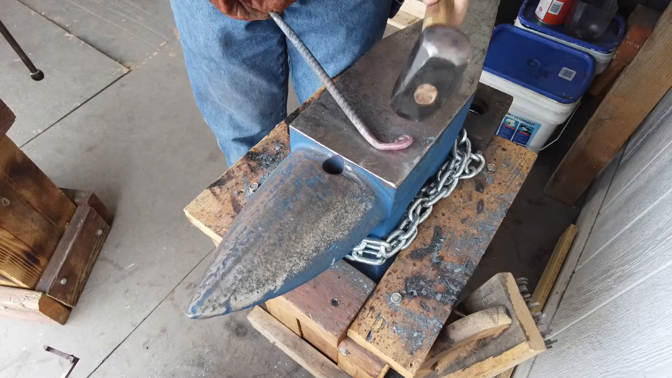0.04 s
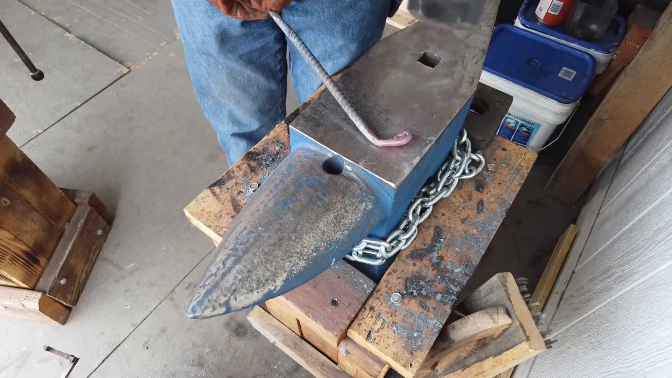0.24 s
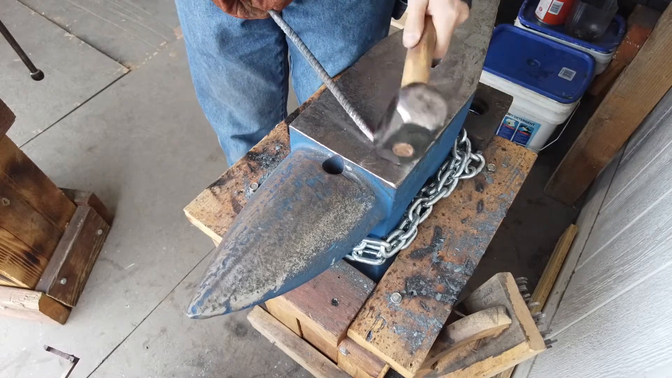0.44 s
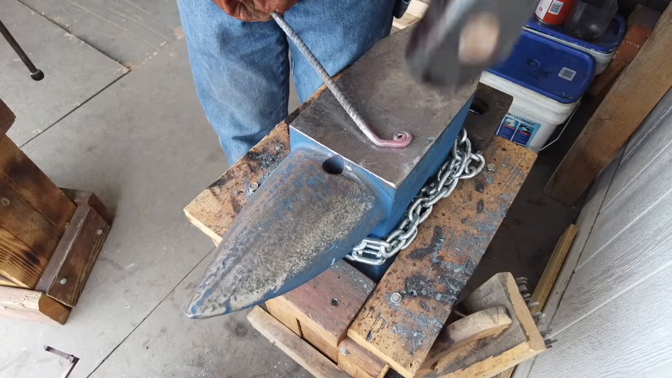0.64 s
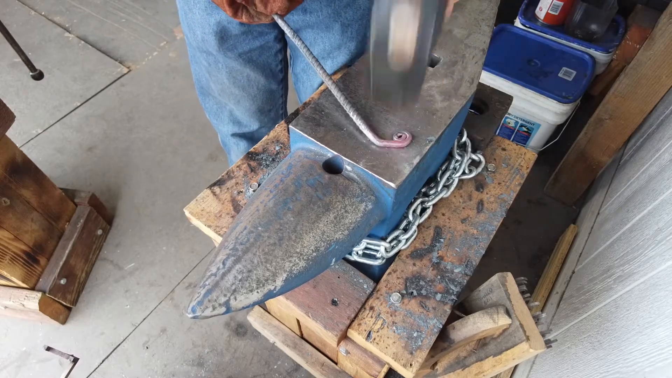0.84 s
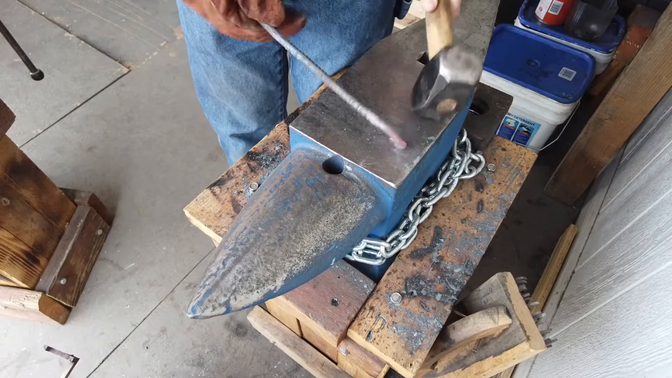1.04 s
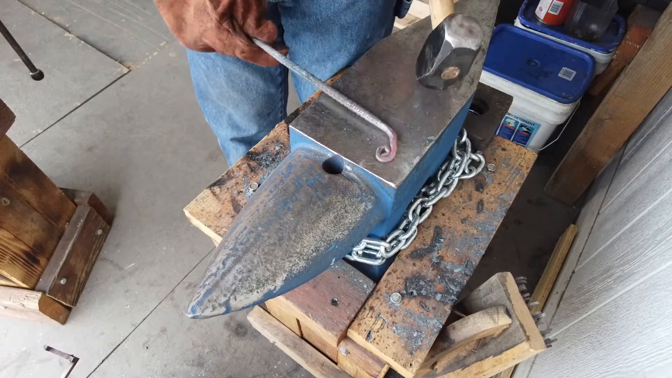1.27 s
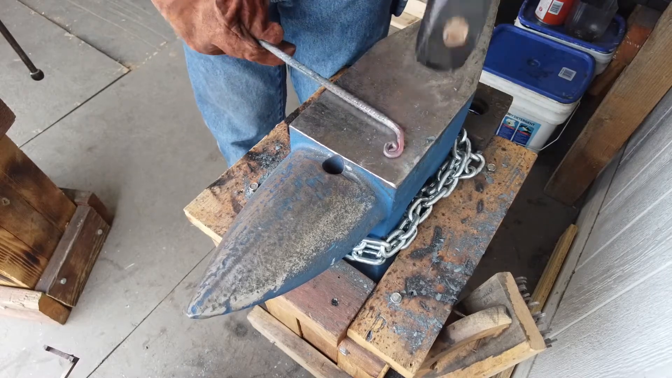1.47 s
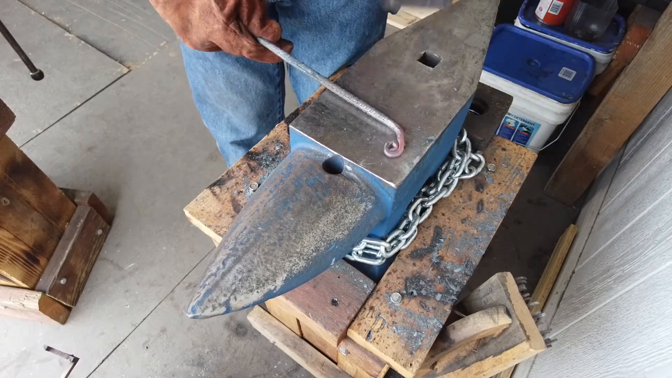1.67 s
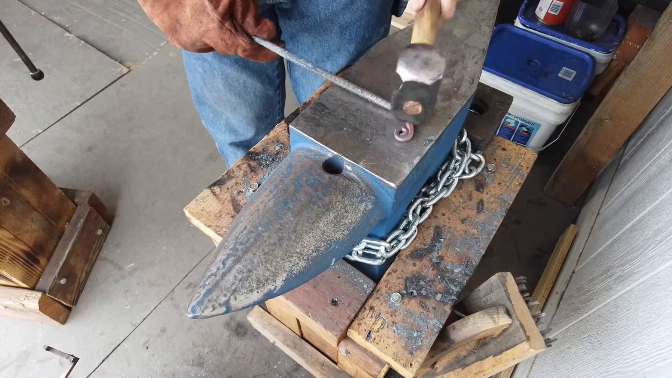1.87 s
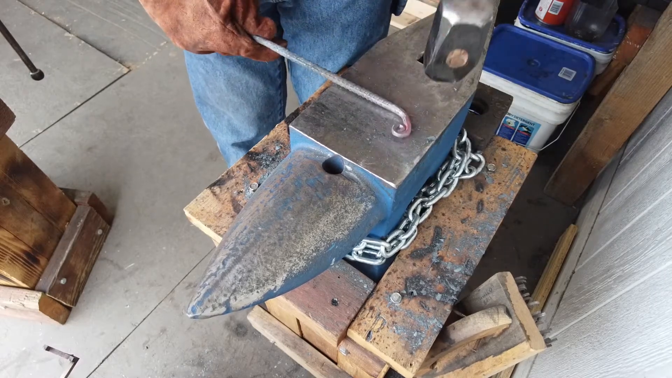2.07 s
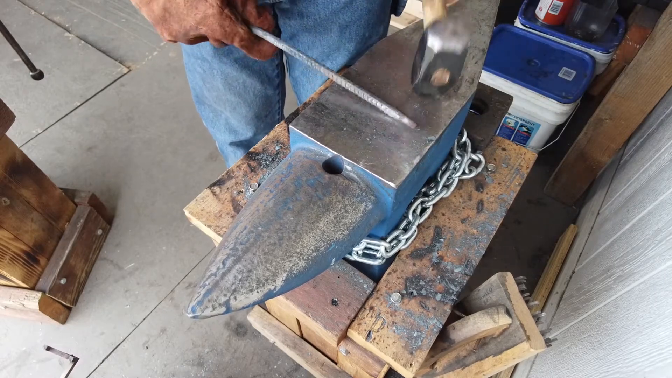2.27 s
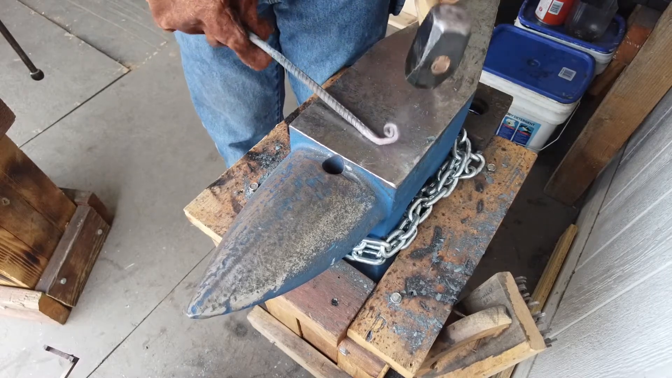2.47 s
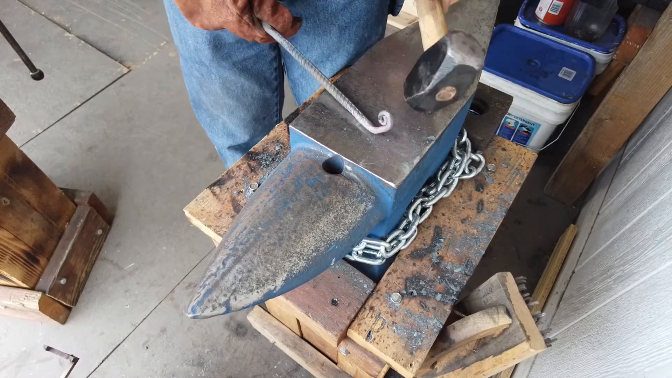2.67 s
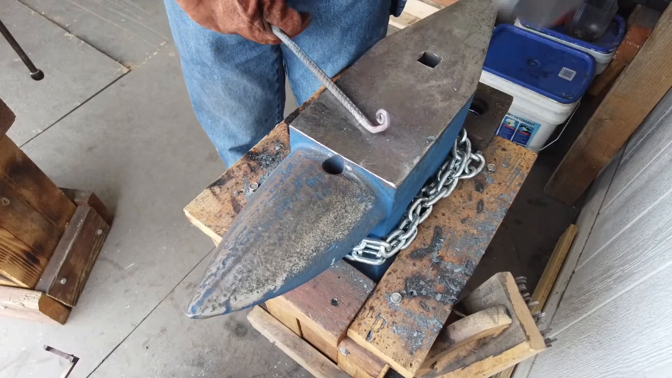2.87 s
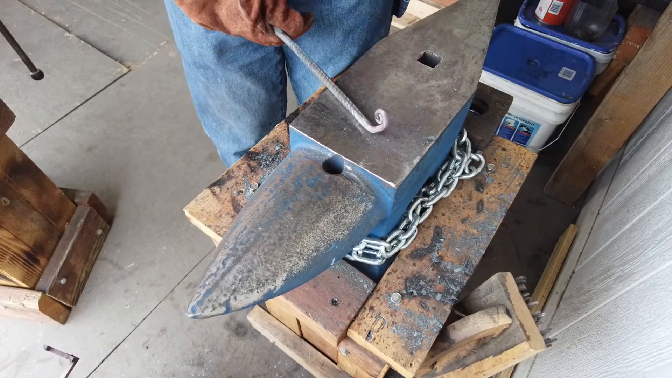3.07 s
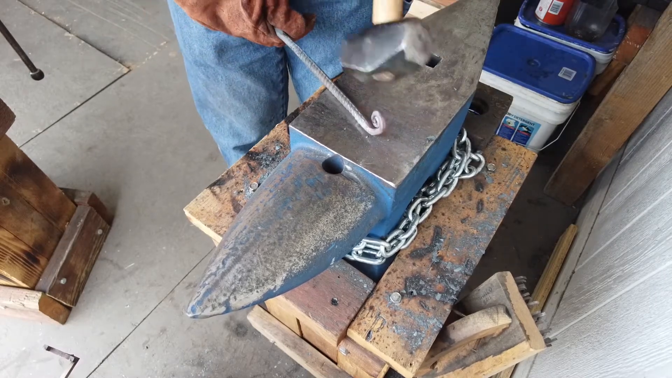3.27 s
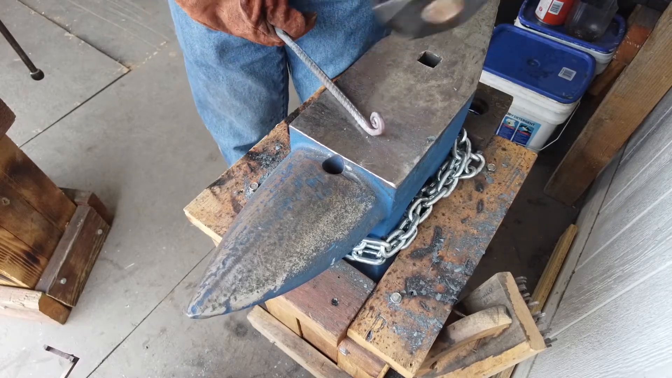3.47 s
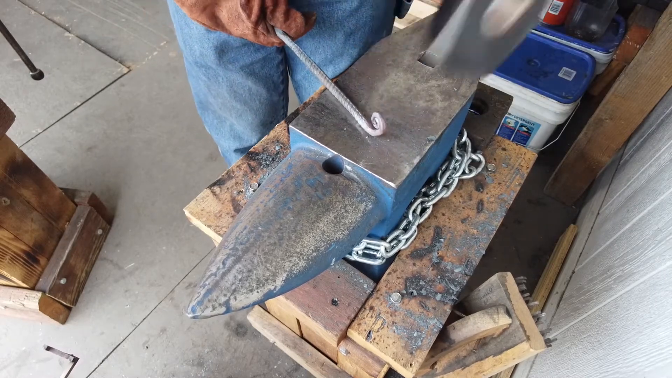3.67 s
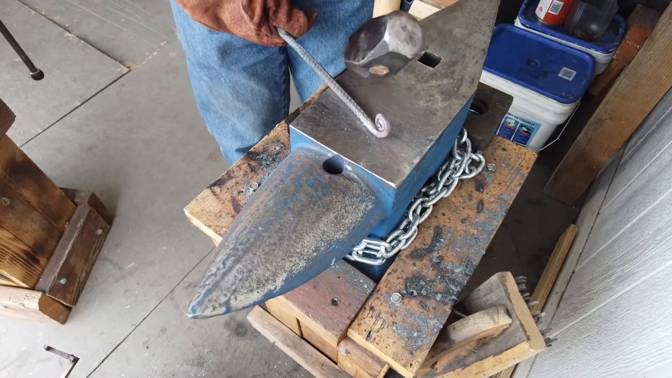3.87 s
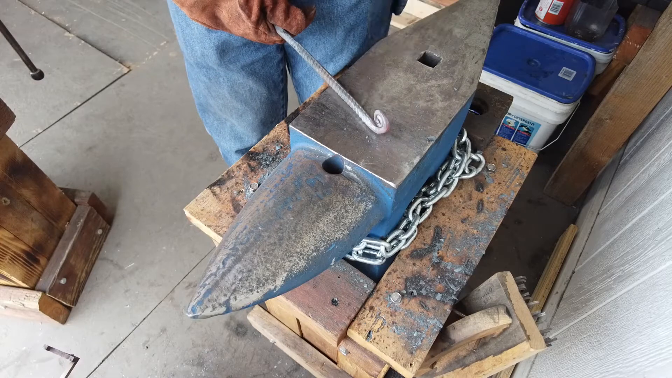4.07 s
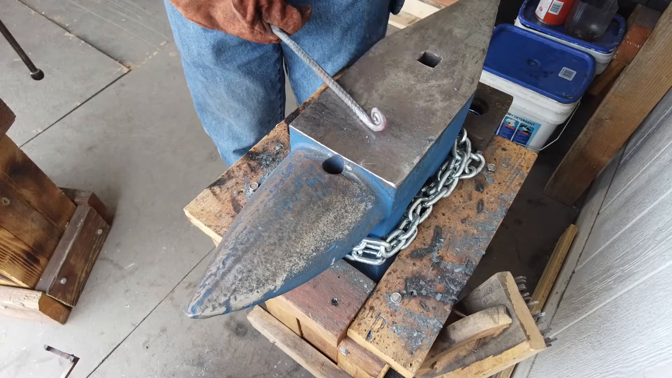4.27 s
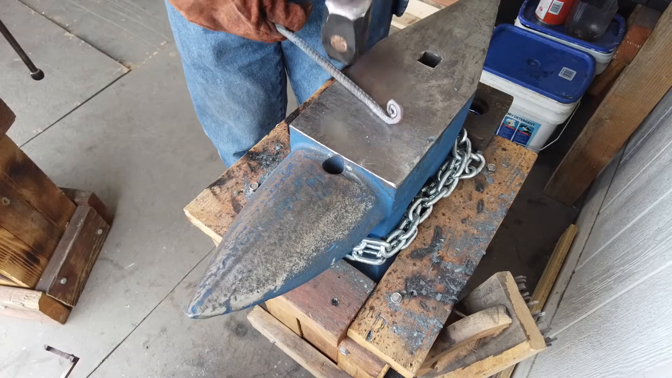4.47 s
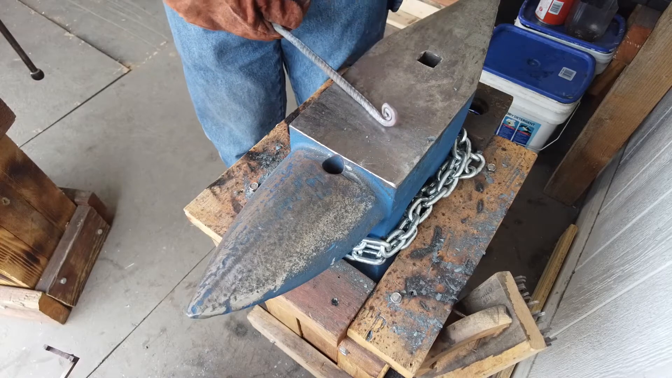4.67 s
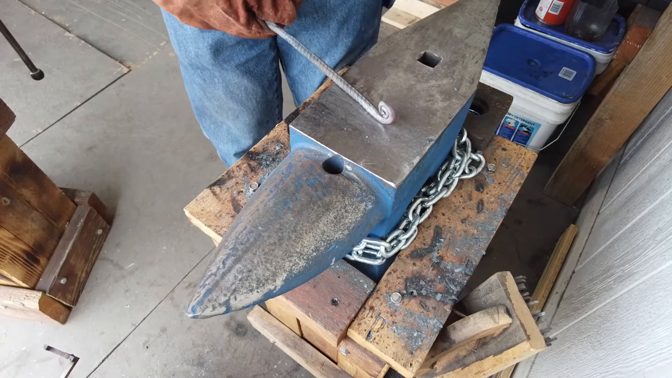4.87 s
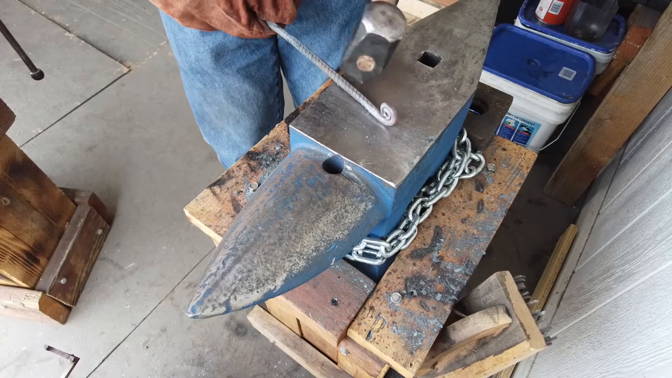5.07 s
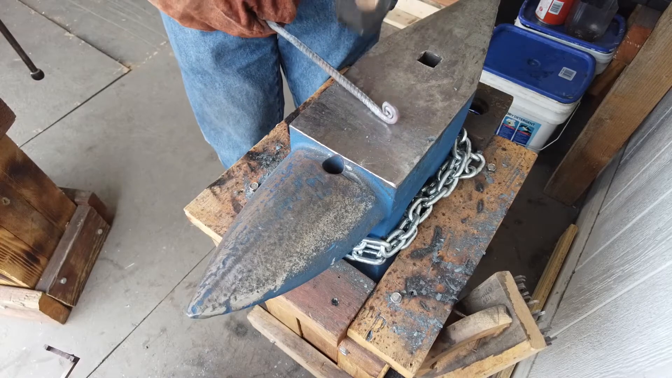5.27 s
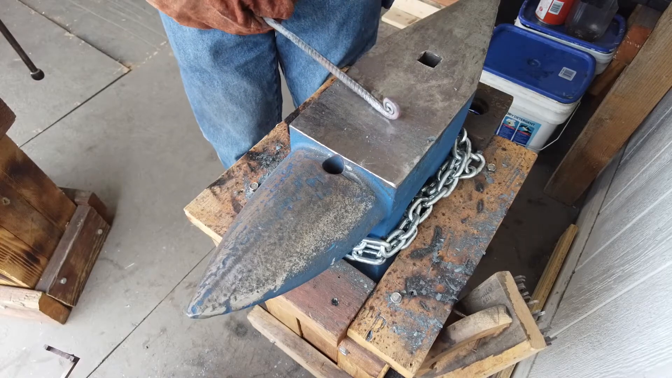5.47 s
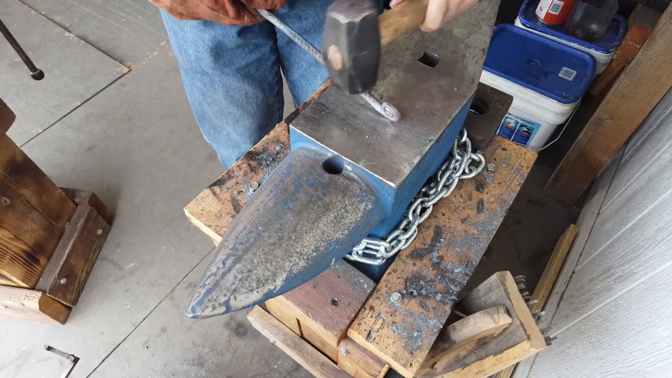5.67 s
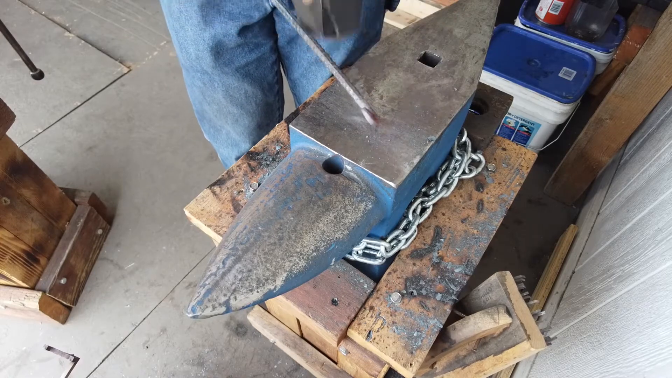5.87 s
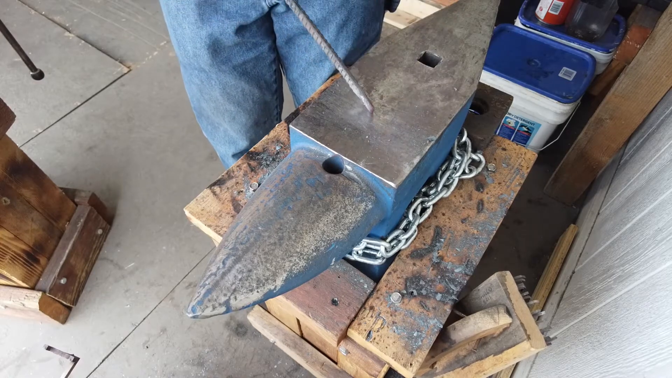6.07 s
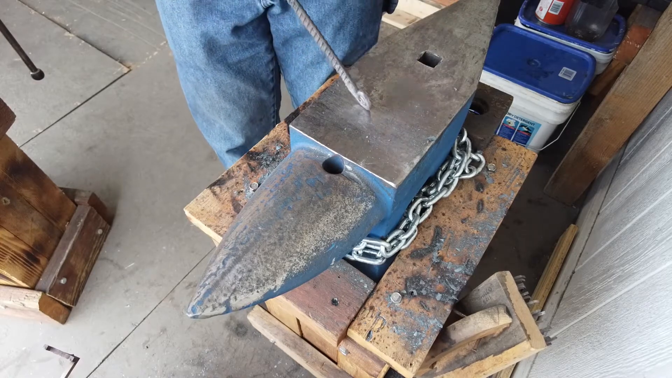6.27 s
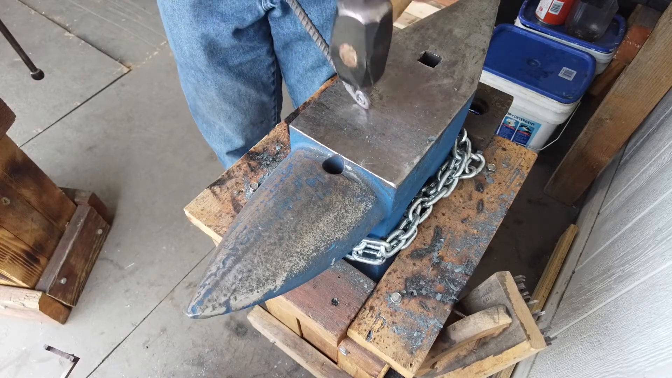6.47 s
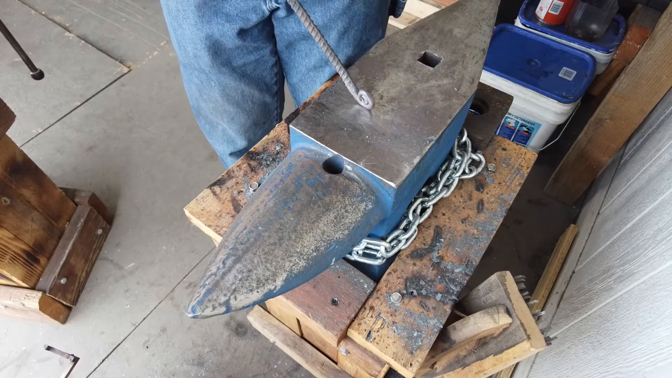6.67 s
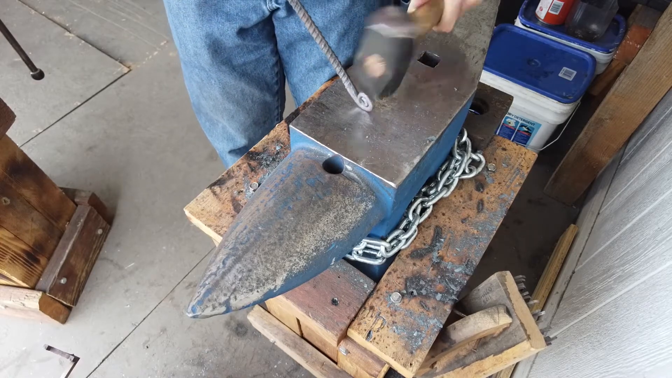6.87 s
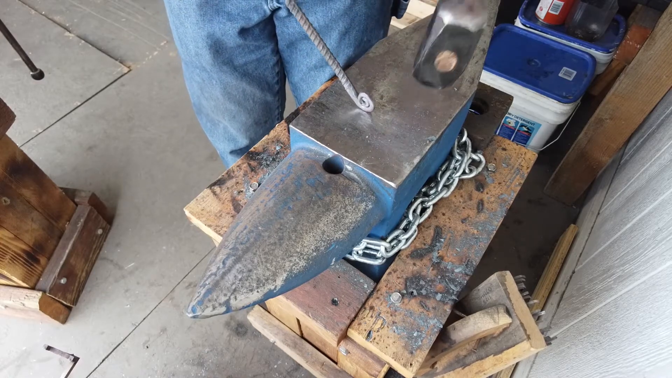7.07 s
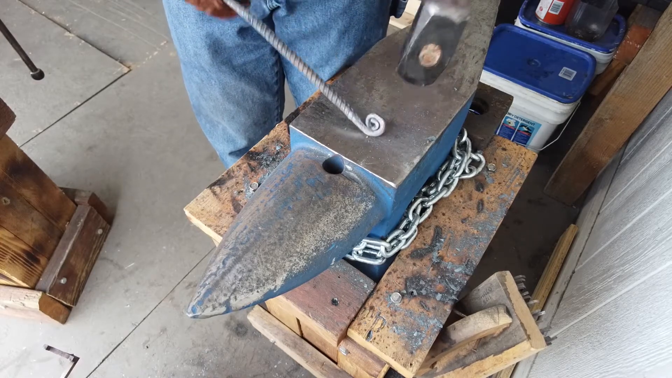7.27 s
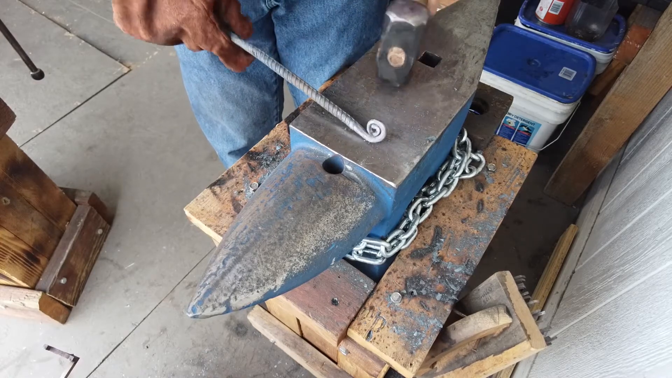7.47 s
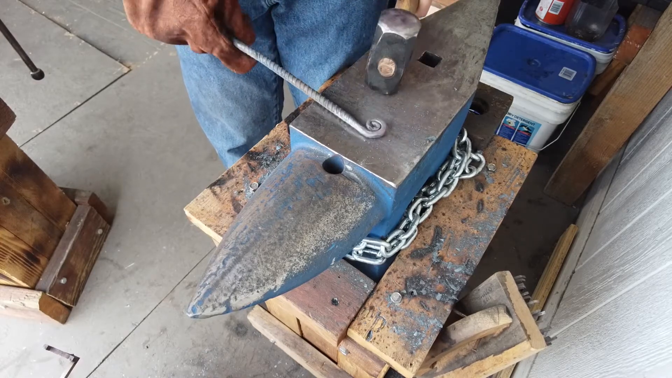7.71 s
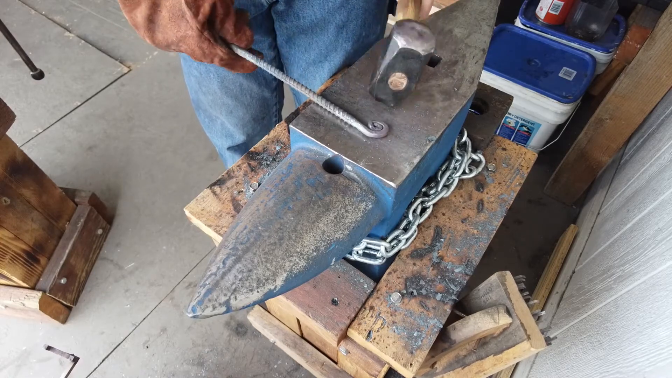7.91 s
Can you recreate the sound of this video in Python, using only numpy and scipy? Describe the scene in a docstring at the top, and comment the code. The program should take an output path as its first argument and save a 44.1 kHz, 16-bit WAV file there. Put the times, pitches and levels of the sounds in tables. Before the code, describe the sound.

A smith works a hot rod on an anvil: three blows, with clanging taps between and after, then a steady run of duller thuds roughly every half second, and finally a flurry of sharp ringing bounces. Low wooden knocks follow the blows, with faint chain jingles. A steady low airy hum continues underneath, with faint hoarse bird chirps far off. Close stereo pickup in a workshop with brief reflections.

```python
"""In a humming workshop a smith hammers a hot steel rod on an anvil that stands on a wooden stand.
Blows on the soft hot steel crack and thud; light taps on the bare anvil face clang and bounce.
Steel rings as decaying modes; thuds, clangs and cracks also carry shaped noise with reflections.
The anvil knocks back onto the wood, its chain rattles, the rod clicks and a far bird chirps in
buzzy glides. Filtered noise makes the rush of air and the hum; a limiter ducks the loudest attacks."""
import sys
import numpy as np
from scipy import signal
from scipy.fft import rfft, irfft
from scipy.io import wavfile
from scipy.ndimage import uniform_filter1d, minimum_filter1d

SR = 44100
rng = np.random.default_rng(int(sys.argv[2]) if len(sys.argv) > 2 else 0)


def bounce(signal):
    """Save signal as a 16-bit WAV file at the path given by the first command-line argument."""
    frames = np.transpose(np.atleast_2d(signal))
    limited = np.clip(frames, -1, 1)
    pcm = np.round(limited * 32767).astype(np.int16)
    wavfile.write(sys.argv[1], SR, pcm)


N = 350154
AGE = np.arange(SR * 3 // 4) / SR  # time since a contact [s]

# Blows on the hot steel, levels ahead of each layer's trim: (time [s], thud [dB],
# clang that gets through to the anvil [dB], crack [dB], high ring [dB],
# knock of the anvil dropping back [dB])
BLOWS = [(0.4018, -13.5, -27.5, -35.5, -64, -38), (0.932, -12, -16, -29, -35, -28.5),
         (1.81, -12.5, -24, -33.5, -52, -28), (3.218, -15.5, -44, -32.5, -36.5, -48),
         (3.777, -14.5, -52, -39, -39, -40), (4.388, -9.5, -45, -36.5, -37, -32),
         (5.013, -11.5, -43.5, -39, -38, -26.5), (5.654, -11.5, -37.5, -37.5, -39, -25.5),
         (6.399, -12.5, -36, -35.5, -39.5, -29.5), (6.927, -12, -30.5, -34.5, -32, -29.5)]
# Spectrum of hard steel contacts: (frequency [Hz], relative level [dB])
CRACK_COLOUR = [(500, -36), (1800, 7.5), (3300, 0.5), (5000, 4.5), (7500, 6.5), (9400, 3.5), (10900, 0),
                (12200, 3.5), (14500, 4.5), (16500, -26)]
# Left-right likeness of the hits' noise: (frequency [Hz], likeness [-1 to 1])
HIT_LIKENESS = [(100, 0.56), (250, 0.9), (500, 0.14), (800, 0), (1400, 0.38), (2500, 0.12), (6000, 0.18),
                (14000, 0)]


def hammer():
    """Blows land on the cushioning hot steel; between them the hammer drops on the bare face and bounces."""
    # Taps on the bare face: (time [s], clang level [dB])
    taps = [(1.0892, -27), (1.14, -26), (1.175, -38), (2.323, -20.5), (2.454, -20.5), (2.561, -23),
            (7.017, -26.5), (7.399, -20), (7.513, -20), (7.591, -22.5), (7.642, -29.5), (7.677, -34)]
    out = np.zeros((2, N))
    for s, thud, clang, crack, high_ring, _ in BLOWS:
        add(out, s, hit(*blow(thud, clang, crack, high_ring)))
    for s, clang in taps:
        add(out, s, hit(*tap(clang)))
    return out


def blow(thud, clang, crack, high_ring):
    """Hot steel cushions a blow: the less clang gets through, the duller the contact."""
    cutoff_hz = 2600 * 2 ** ((clang + 29.5) / 55)  # an octave per 55 dB of clang
    return thud, clang, cutoff_hz, crack, high_ring


def tap(clang):
    """A firmer tap on the bare face is a shorter contact, so its treble grows fastest."""
    harder = clang + 21  # dB above a firm tap
    thud = -21.5 + 0.69 * harder
    cutoff_hz = 3980 * 2 ** (harder / 10.5)  # an octave per 10.5 dB of clang
    crack = -60 + 2.4 * harder
    high_ring = -41 + 6.5 * harder
    return thud, clang, cutoff_hz, crack, high_ring


def hit(thud, clang, cutoff_hz, crack, high_ring, wood_trim_db=-6.5, tone_trim_db=-1.5,
        tick_trim_db=-4.5, high_trim_db=-4.0):
    """A contact shakes the stand, rings the anvil's modes and adds a crack at its own level."""
    # Anvil modes: (frequency [Hz], level tapped on the bare face [dB],
    # level struck through the hot steel [dB], 60 dB decay time [s])
    anvil_modes = [(1275, -12, -9, .2), (1365, -9, -9, .2), (1650, -6, -10, .22), (1688, -5, -7, .22),
                   (1897, 0, 0, .24), (2680, -11, -1, .16), (2774, -4, -2, .19), (4027, -13, -10, .12),
                   (4462, -13, -8, .14), (5415, -1, -8, .2), (6681, 1, -3, .36), (6833, 3, 11, .26),
                   (7671, -7, -3, .3), (7900, -5, -1, .3), (8935, -11, -2, .3), (9484, 1, 1, .29),
                   (9876, -7, -5, .34), (10652, -11, -6, .26), (10960, -11, -12, .2), (11677, -12, -11, .3),
                   (12731, -17, -10, .32), (13652, -15, -5, .32), (14190, -17, -7, .3),
                   (14392, -19, -11, .3), (14578, -15, -5, .3), (14700, -13, -7, .26)]
    # Dense resonances of the wood: (frequency [Hz], relative level [dB])
    wood_colour = [(25, -40), (60, -15.5), (140, 3.5), (250, 0), (400, -9), (600, -19.5), (1000, -23.5),
                   (2000, -32), (4000, -45)]
    # Dense resonances in the clang: (frequency [Hz], relative level [dB])
    clang_colour = [(300, -20), (700, -5.5), (1050, -8.5), (1300, -2), (1850, 5), (2100, -6), (2400, -8.5),
                    (2750, -3), (3600, -10), (4100, -0.5), (4900, -5.5), (6500, -5), (9000, 0),
                    (16000, -37)]

    hz, face_db, work_db, t60 = np.transpose(anvil_modes)
    high = hz > 8500
    cushion = np.clip((thud - clang) / 15, 0, 1)  # more thud than clang: nearer the hot-steel balance
    mode_db = face_db + cushion * (work_db - face_db)
    mode_db += ~high * 20 * np.log10(contact(hz, cutoff_hz))  # only the lower modes dull
    modes = np.column_stack([hz, mode_db, t60])

    wood = burst(wood_colour, 0.14, -0.75, hold=0.058, room_t60=0.3)
    clatter = burst(clang_colour, 0.056, -14.0, hold=0.039, room_t60=0.22, cutoff_hz=cutoff_hz)
    tone = ring(modes[~high], hold=0.002, scatter_db=2.0, diffuse=0.65)
    # The instant of contact
    tick = noise(lambda f: gain_of(read(CRACK_COLOUR, f)), HIT_LIKENESS, len(AGE)) * decay(0.012)
    crackle = burst(CRACK_COLOUR, 0.029, -15.5, hold=0.033, room_t60=0.21)
    # The high ring starts at 0.41 of its level and swells in over some 11 ms
    swell = 1 - (1 - 0.41) * np.exp(-AGE / 0.011)
    shimmer = ring(modes[high], hold=0.0099, scatter_db=2.5, diffuse=0.51) * swell

    sound = at_level(stand(), thud) + at_level(wood, thud + wood_trim_db)
    sound = sound + at_level(clatter, clang) + at_level(tone, clang + tone_trim_db)
    sound += at_level(tick, crack + tick_trim_db) + at_level(crackle, crack)
    return sound + at_level(shimmer, high_ring + high_trim_db)


def stand(delay=0.00491, rise=0.0062):
    """The heavy anvil sinks into its stand a moment (s) after the contact and rocks there."""
    # Rocking modes: (frequency [Hz], relative level [dB], 60 dB decay time [s])
    stand_modes = [(50.8, -4.5, 0.26), (64.4, -1, 0.24), (112, 4, 0.1), (123, -13, 0.58), (140.5, -5, 0.31),
                   (191.4, -18.5, 0.56), (213.3, -14, 0.4), (310.5, -1, 0.024), (485, -28.5, 0.38),
                   (646, -33, 0.32)]
    t = np.maximum(AGE - delay, 0)
    rocking = np.zeros(len(AGE))
    for hz, db, t60 in stand_modes:
        rocking += gain_of(db - 60 * t / t60) * np.sin(2 * np.pi * hz * t)
    return rocking * (1 - np.exp(-t / rise))


def settling(drop_s=0.048, rise=0.0011):
    """Each blow lifts the anvil, which drops back and knocks on the wood drop_s later."""
    # Knock modes: (frequency [Hz], relative level [dB], 60 dB decay time [s])
    knock_modes = [(311, 2.5, 0.11), (417, -2.5, 0.12), (500, -2.5, 0.15), (552, -7, 0.095)]
    out = np.zeros((2, N))
    for s, *_, db in BLOWS:
        knock = ring(knock_modes, scatter_db=3.5, diffuse=0.34, spread=4.65)
        knock *= 1 - np.exp(-AGE / rise)
        add(out, s + drop_s, at_level(knock, db))
    return out


def rod_clicks(ring_trim_db=-1, scrape_trim_db=-4):
    """The rod makes short scratchy contacts on the face as it is turned, ringing its own modes."""
    # Contacts, levels ahead of the trims: (time [s], level [dB])
    clicks = [(1.2394, -34.5), (1.254, -34.5)]
    # Rod modes: (frequency [Hz], relative level [dB], 60 dB decay time [s])
    rod_modes = [(3930, -3, 0.027), (5020, -8, .02), (6250, 6, 0.023), (6350, -4, 0.018),
                 (6700, -25, 0.041), (7660, -14.5, 0.06), (9484, -34, 0.18), (13050, -34, .1)]
    out = np.zeros((2, N))
    for s, db in clicks:
        scrape = burst(CRACK_COLOUR, 0.042, -14.5, hold=0.015, room_t60=0.2)
        add(out, s, at_level(ring(rod_modes), db + ring_trim_db) + at_level(scrape, db + scrape_trim_db))
    return out


def chain(link_trim_db=-1, knock_trim_db=-3):
    """After heavy blows the chain jumps against the anvil: ringing links and a short noisy knock."""
    # Jumps, levels ahead of the trims: (time [s], level [dB])
    rattles = [(3.812, -50), (3.842, -45.5), (3.864, -54), (4.451, -37.5), (4.467, -41), (4.485, -48),
               (5.055, -48), (5.088, -42), (5.695, -47), (6.441, -47)]
    # Modes of a link: (frequency [Hz], relative level [dB], 60 dB decay time [s])
    link_modes = [(2090, -20, 0.022), (2590, 10, 0.026), (2820, 6, 0.03), (3550, -15, 0.018),
                  (5260, -2, .015)]
    # Spectrum of the knock: (frequency [Hz], relative level [dB])
    chain_colour = [(500, -26), (1200, 6.5), (2100, -1), (2750, -5.5), (3400, 0.5), (5000, -10.5),
                    (9000, -22), (16000, -17)]
    out = np.zeros((2, N))
    for s, db in rattles:
        knock = burst(chain_colour, 0.0073, -6.5, hold=0.01, room_t60=0.23)
        add(out, s, at_level(ring(link_modes), db + link_trim_db) + at_level(knock, db + knock_trim_db))
    return out


def bird(buzz_hz=480, unsteady=0.144, echo_t60=0.33, direct=0.37, trim_db=2.5):
    """Sine glides with a fast, unsteady pitch buzz come from far off, blurred by their reflections."""
    # Notes, levels ahead of the trim:
    # (start time [s], length [s], start pitch [Hz], end pitch [Hz], level [dB])
    chirps = [(0.532, .064, 3190, 3520, -60), (0.804, 0.085, 3470, 3130, -58),
              (3.087, 0.1, 3730, 4700, -58), (3.94, 0.096, 3650, 4550, -51.5),
              (4.197, 0.15, 6500, 4160, -57.5), (4.559, 0.062, 3440, 5800, -54.5),
              (4.606, .06, 7150, 6100, -58.5), (4.612, 0.041, 4520, 3310, -52),
              (4.743, .06, 3260, 5570, -52.5), (4.878, 0.055, 4370, 3560, -49.5),
              (5.107, 0.063, 4180, 3150, -50), (5.335, 0.07, 4130, 3150, -51.5),
              (5.539, .06, 3970, 3260, -57)]
    out = np.zeros((2, N))
    for s, length, start_hz, end_hz, db in chirps:
        # Pitch swing as a share of the pitch: falling notes are hoarser
        buzz = 0.057 if end_hz > start_hz else 0.19
        t = np.arange(0, length, 1 / SR)
        drift = evened(signal.resample(rng.standard_normal(14), len(t)))
        flutter = np.sin(2 * np.pi * np.cumsum(buzz_hz * (1 + unsteady * drift)) / SR)
        hz = np.geomspace(start_hz, end_hz, len(t)) * (1 + buzz * (flutter + unsteady * drift))
        note = np.sin(2 * np.pi * np.cumsum(hz) / SR) * np.hanning(len(t))
        paths = rng.standard_normal((2, len(AGE))) * decay(echo_t60)
        paths /= np.linalg.norm(paths[0])
        paths[:, 0] += direct
        echoed = signal.fftconvolve(note[None], paths, axes=1)[:, :len(AGE)]
        add(out, s, at_level(echoed, db + trim_db))
    return out


def workshop(air_db=-29, hum_trim_db=-1):
    """Steady noise makes a rush of air; narrower noise bands are a running machine's humming resonances."""
    # Spectrum of the air: (frequency [Hz], relative level [dB])
    air_colour = [(12, -26), (20, 0.5), (68, -7), (107, 3), (177, -10), (204, -14.5), (277, -5),
                  (310, -14.5), (347, -10), (542, -23.5), (624, -19.5), (1030, -29), (1400, -27.5),
                  (4810, -48), (16000, -57.5)]
    # Humming resonances, ahead of trim and width scaling: (centre [Hz], width [Hz], level [dB])
    hum_bands = [(120, 65, -37.5), (241, 69, -36), (279.5, 27, -42), (348.2, 34.4, -38), (386.6, 40, -42.5),
                 (1600, 490, -53)]
    # Left-right likeness of the background: (frequency [Hz], likeness [-1 to 1])
    room_likeness = [(60, 0.98), (130, 0.99), (290, 0.92), (640, -0.44), (1410, 0.56), (3100, 0.31),
                     (6820, 0.17), (15000, 0.8)]
    out = gain_of(air_db) * noise(lambda hz: gain_of(read(air_colour, hz)), room_likeness, N)
    for centre_hz, width, db in hum_bands:
        def resonance(hz):
            return 1 / (1 + ((hz - centre_hz) / width * 0.93) ** 2) ** 3.1
        out += gain_of(db + hum_trim_db) * noise(resonance, room_likeness, N)
    return out


def ring(modes, hold=0, scatter_db=8.5, diffuse=0.82, spread=0.62):
    """Modes are struck a little differently each time; reflections make each one flutter.

    spread: largest phase offset of each channel, radians per kHz of mode frequency."""
    hz, db, t60 = np.transpose(modes)[:, :, None]
    size = gain_of(db + scatter_db * rng.standard_normal(hz.shape)) * fade(hold, t60)
    waves = size * np.exp(2j * np.pi * hz * AGE)
    phase = 2 * np.pi * rng.random(hz.shape)
    phase = phase + spread * hz / 1000 * rng.uniform(-1, 1, (2, len(hz), 1))
    # Random complex gains, 64 a second, joined by straight lines
    knots = rng.standard_normal((2, len(hz), 52, 2)) @ [1, 1j]
    paths = np.exp(1j * phase) + diffuse * knots
    step, part = np.divmod(AGE * 64, 1)
    step = step.astype(int)
    flutter = paths[..., step] * (1 - part) + paths[..., step + 1] * part
    return (waves * flutter).real.sum(1)


def burst(colour, direct_t60, room_db, hold, room_t60, cutoff_hz=30000):
    """Dense resonances die fast; a softer part holds them briefly, then fades."""
    direct = decay(direct_t60)
    room = gain_of(room_db) * (1 - np.exp(-AGE / 0.0018)) * fade(hold, room_t60)
    grain = noise(lambda hz: gain_of(read(colour, hz)) * contact(hz, cutoff_hz), HIT_LIKENESS, len(AGE))
    return grain * np.hypot(direct, room) * (1 - np.exp(-AGE / 0.00087))


def contact(hz, cutoff_hz):
    """A longer contact, with a lower cutoff, pushes less treble into the steel."""
    return 1 / np.hypot(1, (hz / cutoff_hz) ** 4.06)


def noise(gain, likeness, size):
    """Stereo noise with the spectrum gain(Hz), partly shared by the two channels, at an rms of 1."""
    hz = np.fft.rfftfreq(size, 1 / SR)
    mid, side = rfft(rng.standard_normal((2, size)))
    same = np.clip(read(likeness, hz), -1, 1)
    mid, side = mid * np.sqrt(1 + same), side * np.sqrt(1 - same)
    return evened(irfft(np.array([mid + side, mid - side]) * gain(hz), size))


def fade(hold, t60):
    """Stays near full level for the time hold, then bends into an exponential decay."""
    return 1 / np.hypot(1, gain_of(np.minimum(60 * (AGE - hold) / t60, 200)))


def decay(t60):
    """Exponential decay that falls 60 dB in t60 seconds."""
    return gain_of(-60 * AGE / t60)


def gain_of(db):
    """Decibels to amplitude."""
    return 10 ** (np.asarray(db) / 20)


def evened(x):
    """Scales to an rms of 1."""
    return x / np.sqrt(np.mean(x ** 2) + 1e-20)


def at_level(x, db):
    """Sets the rms level of a sound's first 80 ms."""
    head = x[..., AGE < 0.08]
    return gain_of(db) * x / np.sqrt(np.mean(head ** 2) + 1e-20)


def read(points, hz):
    """Reads a curve between its points along a logarithmic frequency axis."""
    f, value = np.transpose(points)
    return np.interp(np.log(hz + 1), np.log(f + 1), value)


def add(mix, s, sound):
    """Lays a sound into the mix from s seconds, cut off at the mix's end."""
    part = mix[:, round(s * SR):][:, :sound.shape[1]]
    part += sound[:, :part.shape[1]]


def scene():
    """The forging, its loose steel and the bird over the workshop's hum."""
    return hammer() + settling() + rod_clicks() + chain() + bird() + workshop()


def record(dry, ceiling_db=-4.5, recovery_db_per_s=220, edge_hz=16000):
    """A limiter ducks peaks over the ceiling and lets the ring swell back; then a low-pass at edge_hz."""
    over_db = np.maximum(20 * np.log10(abs(dry).max(0) + 1e-9) - ceiling_db, 0)
    fall = np.arange(N) * recovery_db_per_s / SR
    duck_db = fall - np.maximum.accumulate(over_db + fall)
    # Start ducking just ahead of each peak and round the corners
    duck_db = uniform_filter1d(minimum_filter1d(duck_db, size=65), size=65)
    low_pass = signal.firwin(301, edge_hz, window=("kaiser", 9), fs=SR)
    return signal.oaconvolve(dry * gain_of(duck_db), low_pass[None], "same")


dry = scene()
out = record(dry)
bounce(out)
```